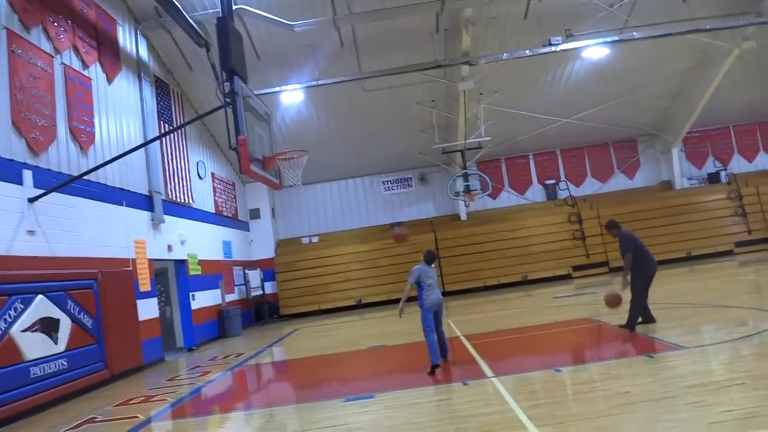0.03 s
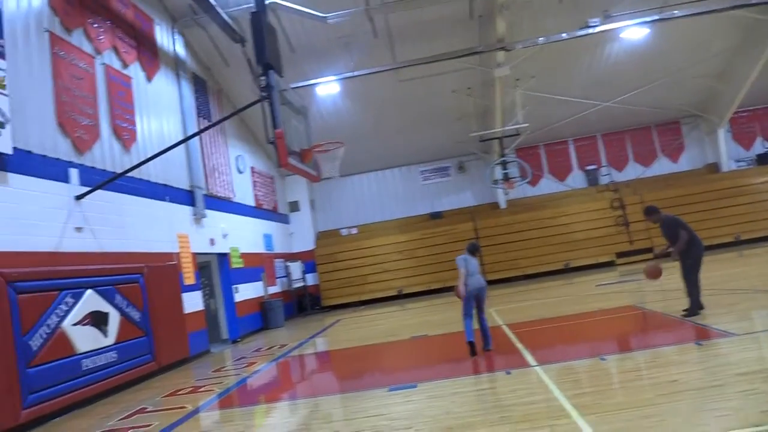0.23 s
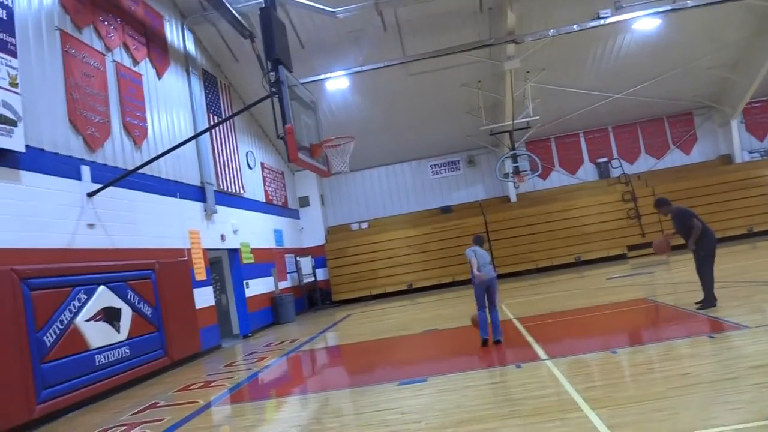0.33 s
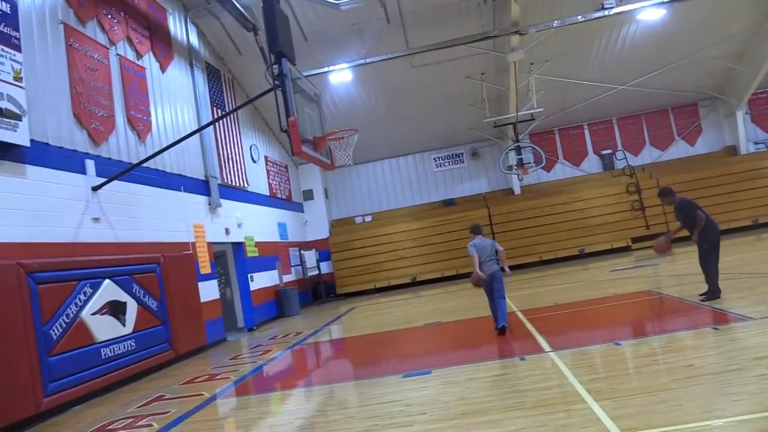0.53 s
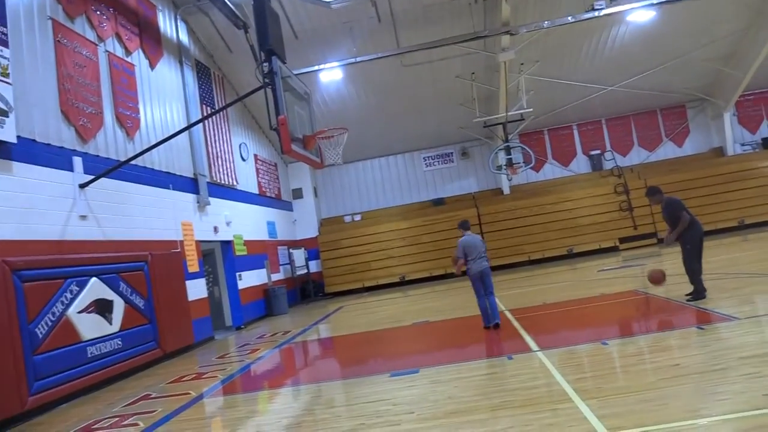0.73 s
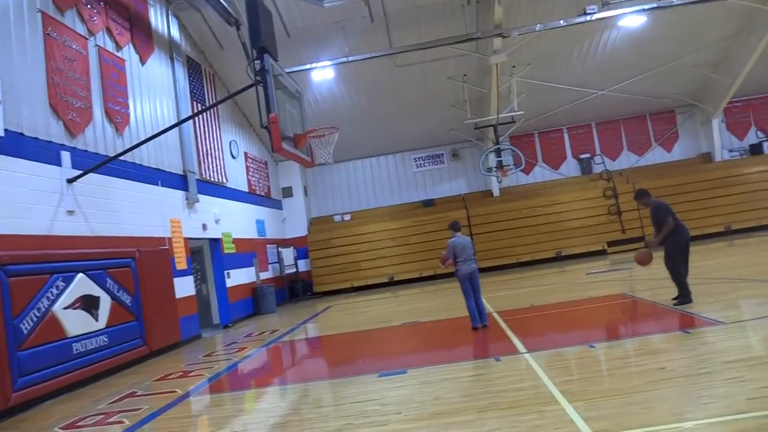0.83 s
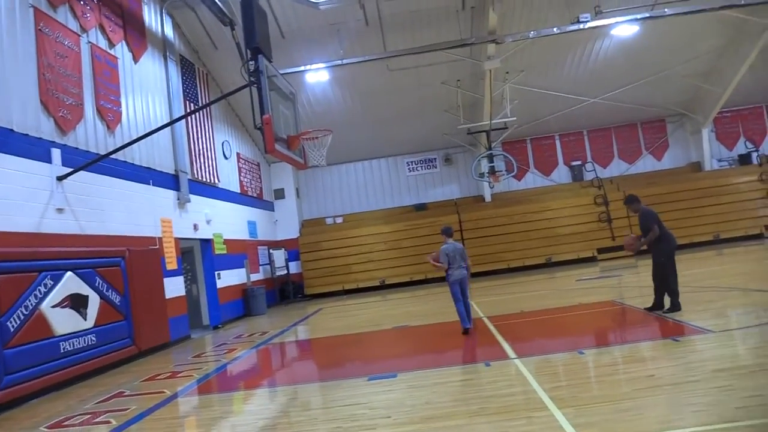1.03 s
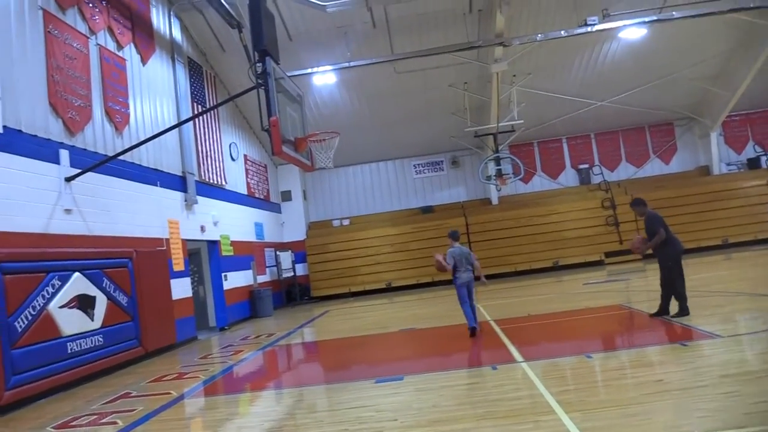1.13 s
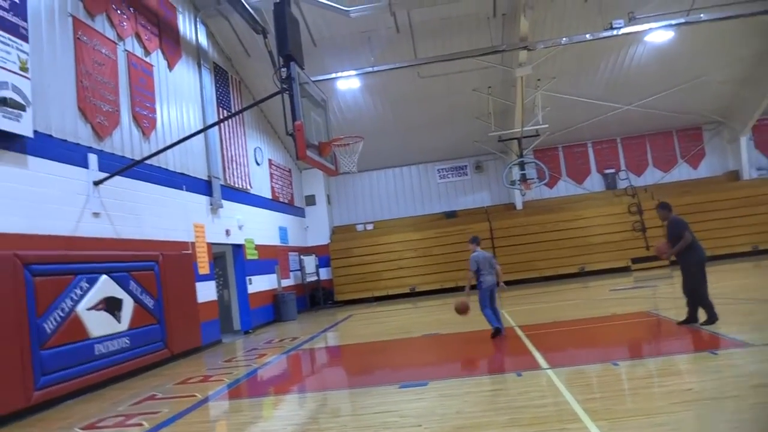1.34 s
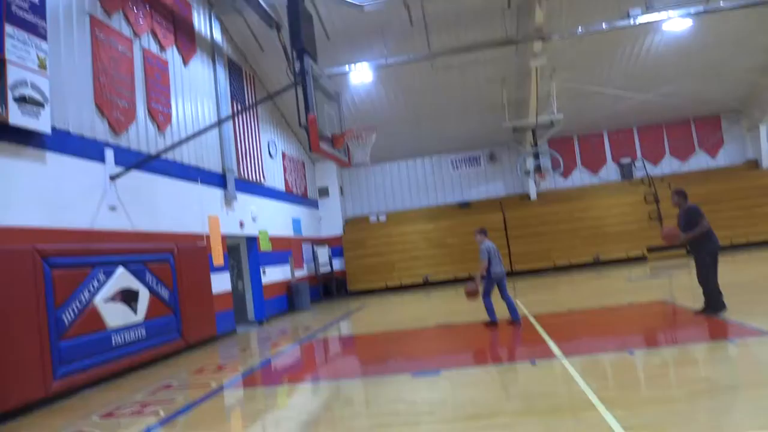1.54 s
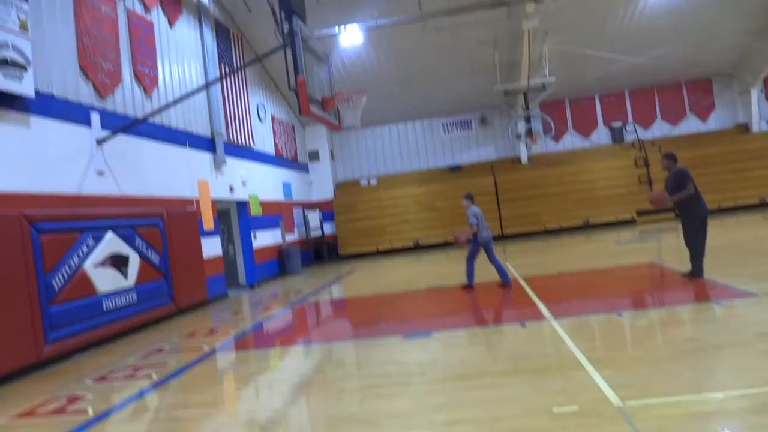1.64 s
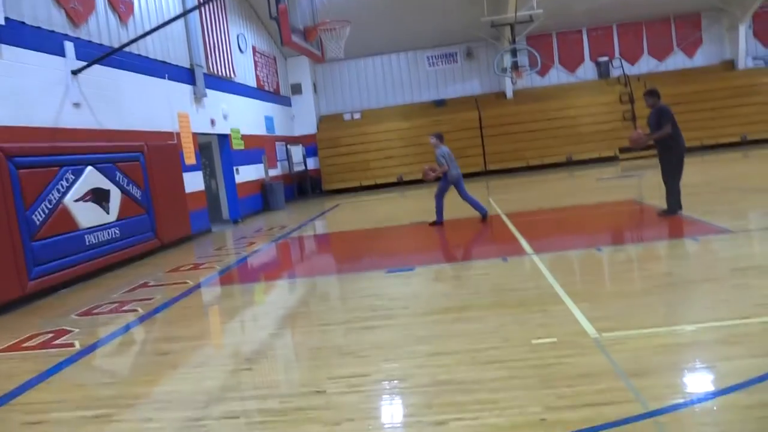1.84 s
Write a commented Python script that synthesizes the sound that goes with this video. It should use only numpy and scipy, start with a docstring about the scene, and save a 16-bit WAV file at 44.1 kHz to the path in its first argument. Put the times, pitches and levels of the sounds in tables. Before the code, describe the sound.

Basketball bounces crack on sprung gym boards at about 0.2, 0.5, 0.8 and 1.5 seconds, the third strongest and the last weaker. Each has a sharp slap, short hollow ring, low thump and long hall echo. Faint footfalls and shoe brushes, a rubbery pat near 0.7 and tiny clicks surround them, over ventilation and a hiss that drops after 1 second. Nearly all sound is on the left channel.

```python
"""In a large gym, two players dribble basketballs on a sprung wooden floor, a few metres from a one-channel microphone.
Each bounce is a sharp slap, a ring of the air in the ball, a low thump of the boards and a click at lift-off.
Short pulses, crackling noise and dying sine waves make it; delayed copies are the echoes, fading noise is the hall.
Around the bounces: thuds and brushes of shoes, a short rubbery pat and dry treble clicks, some of them the
ceiling's echo about 70 ms after a bounce, others stray ticks; ventilation noise and hiss lie under it all."""
import sys
import numpy as np
from scipy import signal
from scipy.fft import rfft, irfft, next_fast_len
from scipy.io import wavfile

SR = 44100
rng = np.random.default_rng(int(sys.argv[2]) if len(sys.argv) > 2 else 0)


def generate_wav(signal):
    """Clip the signal to [-1, 1] and save it as 16-bit WAV at the path in sys.argv[1]."""
    frames = np.transpose(np.atleast_2d(signal))
    scaled = np.clip(frames, -1, 1) * 32767
    pcm = np.round(scaled).astype(np.int16)
    wavfile.write(sys.argv[1], SR, pcm)


N = 83790
T = np.arange(N) / SR  # time [s]


def bounces():
    """Each bounce joins ball, boards and lift-off with the answers of walls, roof and hall."""
    # every bounce: (time [s], player, slap level [dB], treble tilt [dB at 3 kHz], thump level [dB],
    # thump pitch [Hz], contact time [s], lift-off level [dB], hall level [dB], level of each ball mode [dB])
    bounce_list = [(0.2063, "right", -1, 1.5, -7, 106, .0140, -8, 0.5, (-22, -13.5, -24, -17, -29, -36)),
                   (.4792, "left", -2.5, 0, -6.5, 103.7, 0.015, -12, 1.5, (-42, -13.5, -12.5, -16, -36, -45)),
                   (0.7847, "right", 2.5, -0.5, -8, 107.1, 0.011, -6.5, 2.5, (-24, -18.5, -7, -18, -9.5, -7.5)),
                   (1.5304, "left", -8.5, 1.5, -9.5, 98.2, 0.013, -8.5, 3, (-21, -12.5, -29, -5.5, -5.5, -21))]
    thump_lag_s = 0.0014  # the boards yield a moment after the slap
    out = np.zeros(N)
    for (time_s, player, slap_db, tilt_db, thump_db, thump_hz,
         contact_s, lift_db, hall_db, mode_dbs) in bounce_list:
        slap = amp(slap_db) * skin_slap(tilt_db)
        ball = slap - ball_ring(player, mode_dbs) + lingering_ring()
        thump = amp(thump_db) * board_thump(player, thump_hz)
        lift = amp(lift_db) * lift_off(player, contact_s)
        direct = ball + later(thump, thump_lag_s) + lift
        answer = echoes(player, ball, thump) + shimmer(player) + bounce_hall(hall_db, thump_db, tilt_db)
        out += later(direct + answer, time_s)
    return out


def skin_slap(tilt_db):
    """The skin hits the boards: one short pulse plus the fine crackle of the pebbled skin."""
    # tone of the slap: (frequency [Hz], relative level [dB])
    slap_tone = [(60, 23), (300, 14), (700, 9.5), (1400, 12.5), (2500, 14.5), (3800, 6), (5000, 0),
                 (9000, -4.5), (16000, -19.5)]
    # tone of the crackle: (frequency [Hz], relative level [dB])
    crackle_tone = [(2000, -3), (3900, 4.5), (5000, -7.5), (10000, -17.5), (16000, -15)]
    crackle_db, crackle_t60_s, crackle_low_hz = -17.5, 0.013, 3000
    pulse = -later(impulse(lambda hz: along(slap_tone, hz)), 0)
    crackle = filtered(noise(crackle_tone), lambda hz: hz > crackle_low_hz) * decay(crackle_t60_s)
    return tilted(pulse + amp(crackle_db) * crackle, tilt_db)


def ball_ring(player, mode_dbs):
    """The blow sets the air and shell of the ball vibrating at several pitches, which die away."""
    # air and shell modes of each player's ball: (frequency [Hz], time to fall 60 dB [s])
    ball_modes = {"right": [(850, 0.014), (1040, 0.044), (1290, .013), (1530, 0.019), (2550, 0.0056),
                  (3720, 0.0073)], "left": [(900, 0.032), (1040, 0.03), (1380, 0.0059), (1760, 0.0095),
                  (2430, 0.0087), (3450, 0.016)]}
    lag_s, attack_s = 0.00007, 0.0001  # the shell, too, yields a moment late
    tone = np.zeros(N)
    for (hz, t60), db in zip(ball_modes[player], mode_dbs):
        tone += amp(db) * decay(t60) * np.cos(2 * np.pi * hz * (T - lag_s))
    return tone * rise(attack_s)


def lingering_ring():
    """The ball's ring lingering in the hall: narrow bands of noise that die together."""
    # bands of the lingering ring: (centre frequency [Hz], relative level [dB])
    ring_bands = [(1033, -3), (1247, -5), (1490, -5), (1628, -2), (2416, -9), (3688, -5), (3841, -33.5)]
    ring_db, half_width_hz, t60_s = -35, 14, 0.68

    def band_gain(f):
        return sum(amp(db) / (1 + ((f - hz) / half_width_hz) ** 2) for hz, db in ring_bands)

    x = filtered(rng.standard_normal(N), band_gain)
    return amp(ring_db) * x / x.std() * decay(t60_s)


def board_thump(player, pitch_hz):
    """The sprung boards swing at a low pitch and at multiples of it, each dying at its own speed."""
    # modes of the boards at each player's spot: (multiple of the thump pitch, level [dB], time to fall 60 dB [s])
    board_modes = {"right": [(1, 0, 0.038), (.72, -6, 0.11), (1.87, -10.5, 0.12), (2.3, -11, 0.015),
                   (3.7, -15.5, 0.091)], "left": [(1, 1.5, 0.021), (.75, -18, 0.22), (1.95, -13, 0.067),
                   (2.35, -10, 0.01), (3.9, -19, 0.18), (4.65, -22, 0.3)]}
    attack_s, hold_s = 0.0026, 0.0083
    tone = np.zeros(N)
    for multiple, db, t60 in board_modes[player]:
        tone += amp(db) * decay(t60, hold_s) * np.sin(2 * np.pi * multiple * pitch_hz * T)
    return tone * rise(attack_s)


def lift_off(player, contact_s):
    """The ball springs off the boards with a click, smeared by the time it takes to peel away."""
    # tone of each player's lift-off click: (frequency [Hz], relative level [dB])
    lift_tone = {"right": [(100, 3), (700, 20), (1500, 21.5), (2600, 7), (3800, 14), (6000, -11),
                 (16000, -26)], "left": [(100, 12), (700, 24), (1500, 20.5), (2600, 17.5), (3800, 22),
                 (5000, 14), (7000, 5.5), (16000, -12)]}
    # how long each player's ball takes to peel off: time to fall 60 dB [s]
    peel_t60 = {"right": 0.032, "left": 0.0045}
    click = later(impulse(lambda hz: along(lift_tone[player], hz)), contact_s)
    return scattered(click, peel_t60[player])


def echoes(player, ball, thump):
    """Walls and roof send back delayed copies; bleachers and roof beams smear the ball's part."""
    # answers at each player's spot: (delay [s], thump level [dB], level of slap and ring [dB])
    echo_list = {"right": [(.0215, -9, -31), (.0305, -8, -34), (.039, -15.5, -39), (.087, -12, -21.5),
                 (.15, -18, -42), (.235, -24.5, -31)], "left": [(.0245, -8.5, -17), (.040, -17, -18.5),
                 (.066, -15.5, -23), (.085, -15, -13)]}
    cut_hz, scatter_t60_s = 2400, 0.028  # walls and roof return little treble
    far_ball = scattered(dulled(ball, cut_hz), scatter_t60_s)
    return sum(later(amp(low_db) * thump + amp(high_db) * far_ball, delay)
               for delay, low_db, high_db in echo_list[player])


def shimmer(player):
    """A swell of high treble in the hall's answer, made of noise."""
    # tone of the swell: (frequency [Hz], relative level [dB])
    shimmer_tone = [(3000, -25), (5500, 5.5), (9000, -4), (16000, -11)]
    # loudness of the swell for each player: level [dB]
    shimmer_level = {"right": -51, "left": -63}
    delay_s, length_s = 0.0072, 0.17
    return amp(shimmer_level[player]) * later(noise(shimmer_tone) * swell(length_s), delay_s)


def bounce_hall(hall_db, thump_db, tilt_db):
    """The hall rings on: its bass follows the thump, and the rest has its own level and tilt."""
    split_hz, bass_db, tilt_share = 1120, 13.5, 0.52
    bass_build_s = 0.072  # the bass takes longer to fill the hall
    overall_db = -24.5
    diffuse = hall_noise()
    bass = filtered(diffuse, lambda hz: 1 / (1 + (hz / split_hz) ** 4))
    tail = amp(hall_db) * tilted(diffuse - bass, tilt_db * tilt_share)
    boom = amp(thump_db + bass_db) * bass * rise(bass_build_s)
    return amp(overall_db) * (tail + boom)


def hall_noise():
    """Many blurred reflections, heard as coloured noise that dies away."""
    # tone of the hall before it decays: (frequency [Hz], relative level [dB])
    hall_tone = [(30, -14), (55, 13), (80, 27), (125, 23), (175, 13.5), (280, 2.5), (400, 13.5), (600, 3),
                 (1050, 6), (2000, 2), (3000, 1), (3900, 0), (5000, -13.5), (8000, -23), (15000, -32)]
    return hall(noise(hall_tone))


def hall(x):
    """Noise x builds up and dies as the hall does, each frequency at its own speed."""
    # decay of the hall: (frequency [Hz], time to fall 60 dB [s])
    hall_decay = [(80, 0.69), (250, 1.04), (500, 0.72), (1300, 1.337), (3800, 1.13), (6000, 0.64),
                  (14000, 0.42)]
    delay_s, build_s = 0.002, 0.0058
    hz, t, z = signal.stft(x, SR, nperseg=512)
    fade = amp(-60 * t / along(hall_decay, hz)[:, None])
    tail = signal.istft(z * fade, SR, nperseg=512)[1][:N]
    return later(tail * rise(build_s), delay_s)


def pat():
    """A short rubbery pat, likely a palm on a ball: a brief swell of tones and its hall answer."""
    # tones of the pat: (frequency [Hz], relative level [dB])
    pat_tones = [(345, 0.5), (700, -11), (860, -25), (1030, -7)]
    start_s, length_s, pat_db, wet_db = 0.675, 0.016, -18.5, -2.5
    touch = swell(length_s) * sum(amp(db) * np.sin(2 * np.pi * hz * T) for hz, db in pat_tones)
    room = hall(rng.standard_normal(N))
    wet = signal.fftconvolve(touch, room / np.linalg.norm(room))[:N]
    return amp(pat_db) * later(touch + amp(wet_db) * wet, start_s)


def footfalls():
    """Feet land as soft low thuds on the boards, each with a little hall."""
    # every footfall: (time [s], level [dB])
    step_list = [(.023, -28), (0.05, -34), (0.165, -24), (1.013, -44), (1.442, -38), (1.812, -35)]
    thud_hz, attack_s, t60_s, step_hall_db = 115, 0.0037, 0.03, -19
    thud = np.sin(2 * np.pi * thud_hz * T) * decay(t60_s, attack_s) * rise(attack_s)
    return sum(amp(db) * later(2 * thud + amp(step_hall_db) * hall_noise(), s) for s, db in step_list)


def scuffs():
    """Soles brush the boards: short swells of noise."""
    # every scuff: (time [s], length [s], level [dB])
    scuff_list = [(.172, 0.034, -40.5), (0.67, 0.029, -39.5)]
    # tone of a scuff: (frequency [Hz], relative level [dB])
    scuff_tone = [(300, -12), (1500, 6), (3500, 6.5), (5500, -2), (10000, -11.5), (16000, -17)]
    return sum(amp(db) * later(noise(scuff_tone) * swell(length), s) for s, length, db in scuff_list)


def treble_clicks():
    """Faint dry treble clicks, noise that dies fast: some are the ceiling's echo, others stray ticks."""
    # ceiling echoes (about 70 ms after a bounce) and stray ticks: (time [s], level [dB])
    click_list = [(0.2302, -34), (0.273, -35.5), (0.5522, -38.5), (.8525, -41), (1.099, -47.5),
                  (1.597, -43), (1.749, -47), (1.821, -42), (1.835, -44)]
    # tone of a click: (frequency [Hz], relative level [dB])
    click_tone = [(1000, -12), (4000, -3), (7500, -10), (16000, -22)]
    t60_s = 0.024
    return sum(amp(db) * later(noise(click_tone) * decay(t60_s), s) for s, db in click_list)


def ventilation():
    """Moving air makes a steady noise, strongest in the low tones."""
    # tone of the air noise: (frequency [Hz], relative level [dB])
    air_tone = [(15, -10), (25, -9.5), (70, -6), (114, -6), (145, -10), (309, -5), (489, -6), (796, -14),
                (911, -11), (1560, -21.5), (1790, -21.5), (3920, -22.5), (16000, -72.5)]
    air_db = -45
    return amp(air_db) * noise(air_tone)


def treble_hiss():
    """A hiss whose level drifts, weaker toward the end."""
    # loudness of the hiss: (time [s], level [dB])
    hiss_level = [(0, -47.5), (.15, -49), (.45, -48), (.9, -47.5), (1.1, -55), (1.9, -54)]
    # tone of the hiss: (frequency [Hz], relative level [dB])
    hiss_tone = [(500, 9), (2000, 9), (3800, 12.5), (5500, 2), (9500, -2), (12000, -10.5), (16000, -22)]
    return amp(np.interp(T, *np.transpose(hiss_level))) * noise(hiss_tone)


def idle_hiss():
    """The faint hiss of the idle right channel."""
    # tone of that hiss: (frequency [Hz], relative level [dB])
    idle_tone = [(30, -5), (300, -3), (3000, -3.5), (16000, -5)]
    idle_db = -76
    return amp(idle_db) * noise(idle_tone)


def amp(db):
    """Decibels to gain."""
    return 10 ** (np.asarray(db) / 20)


def along(points, hz):
    """Read a curve of (frequency [Hz], value) points on a log frequency axis."""
    f, v = np.transpose(points)
    return np.interp(np.log(hz + 1), np.log(f + 1), v)


def filtered(x, gain):
    """x times a gain that depends on frequency."""
    m = next_fast_len(N + SR // 2)
    return irfft(rfft(x, m) * gain(np.fft.rfftfreq(m, 1 / SR)), m)[:N]


def noise(colour):
    """Noise with the given tone, scaled to an rms level of 1."""
    x = filtered(rng.standard_normal(N), lambda hz: amp(along(colour, hz)))
    return x / x.std()


def impulse(gain_db, size=4096):
    """The pulse with the given spectrum whose energy comes as early as possible (minimum phase)."""
    cepstrum = irfft(np.log(amp(gain_db(np.fft.rfftfreq(size, 1 / SR)))))
    # folding the second half onto the first puts all the energy after time zero
    fold = np.r_[1, np.full(size // 2 - 1, 2), 1, np.zeros(size // 2 - 1)]
    return irfft(np.exp(rfft(cepstrum * fold)))


def later(x, s):
    """x delayed by s seconds, N samples long."""
    return np.pad(x, (max(0, int(round(s * SR))), N))[:N]


def rise(time_s):
    """A smooth start from 0 toward 1; about two thirds up after time_s."""
    return 1 - np.exp(-T / time_s)


def decay(t60, hold=0):
    """Holds, then falls 60 dB in t60 seconds."""
    return amp(-60 * np.maximum(T - hold, 0) / t60)


def swell(length):
    """One smooth rise and fall."""
    return np.sin(np.pi * np.minimum(T / length, 1)) ** 2


def tilted(x, tilt_db, corner_hz=3000):
    """A softer contact (negative tilt) has less treble; tilt_db is the change at the corner."""
    return signal.fftconvolve(x, impulse(lambda hz: tilt_db * np.log2(1 + (hz / corner_hz) ** 2)))[:N]


def dulled(x, cut_hz):
    """x with its treble weakened above cut_hz."""
    return signal.sosfilt(signal.butter(2, cut_hz, fs=SR, output="sos"), x)


def scattered(x, t60, size=2048):
    """x smeared over a short, dying spray of random copies."""
    spray = rng.standard_normal(size) * decay(t60)[:size]
    return signal.fftconvolve(x, spray / np.linalg.norm(spray))[:N]


def scene():
    """Play with its deep bass thinned, plus clicks and noise, on the left; the right is almost silent."""
    low_cut_hz, right_db = 70, -65
    thin = signal.butter(3, low_cut_hz, "high", fs=SR, output="sos")
    play = signal.sosfilt(thin, bounces() + pat() + footfalls() + scuffs())
    left = play + treble_clicks() + ventilation() + treble_hiss()
    right = amp(right_db) * left + idle_hiss()
    return np.array([left, right])


def record(dry):
    """Peaks bend smoothly under a ceiling, then the highest treble is removed."""
    ceiling, top_hz, fade_hz = 1.04, 16300, 600
    held = dry / (1 + np.abs(dry / ceiling) ** 6) ** (1 / 6)
    return np.array([filtered(x, lambda hz: np.clip((top_hz - hz) / fade_hz + 0.5, 0, 1)) for x in held])


dry = scene()
out = record(dry)
generate_wav(out)
```